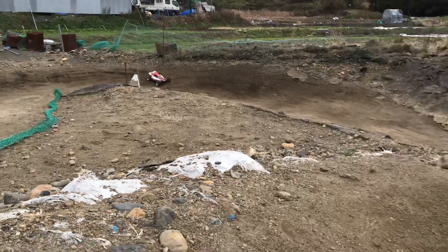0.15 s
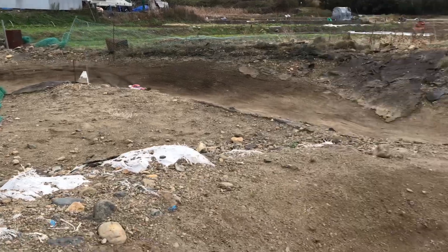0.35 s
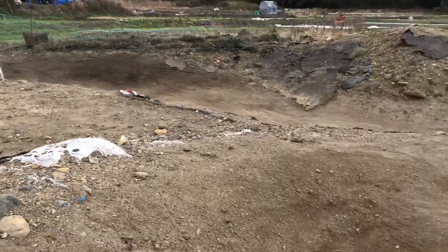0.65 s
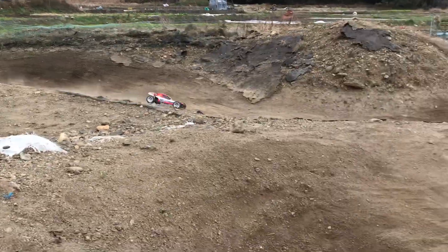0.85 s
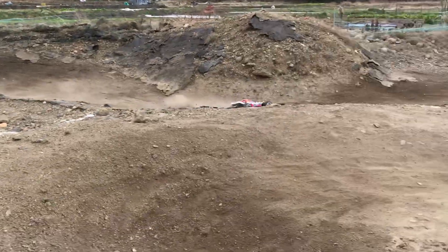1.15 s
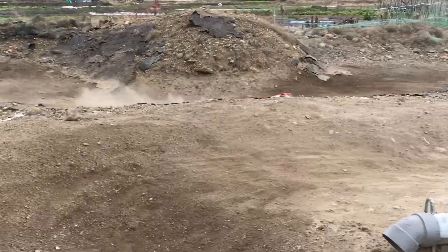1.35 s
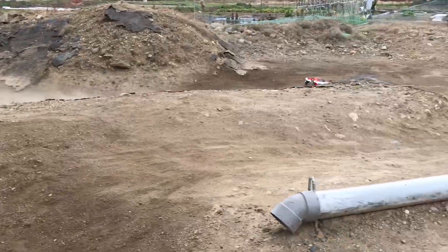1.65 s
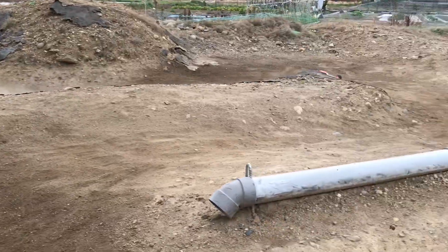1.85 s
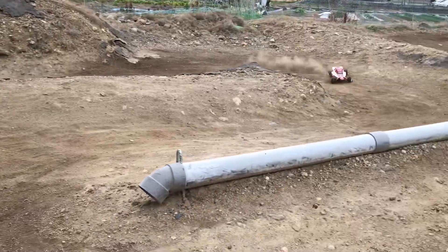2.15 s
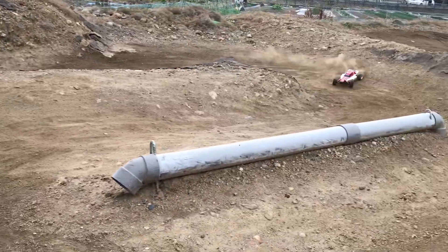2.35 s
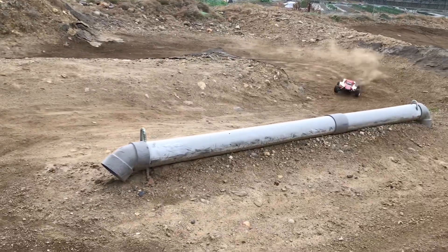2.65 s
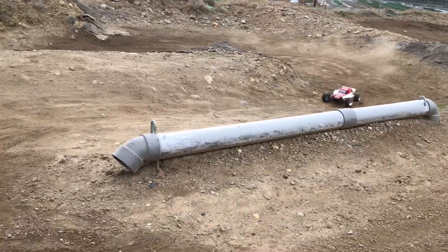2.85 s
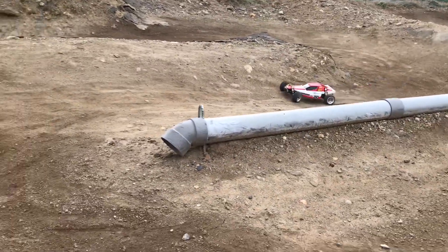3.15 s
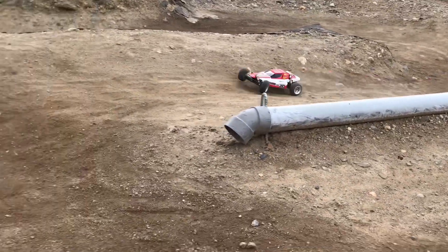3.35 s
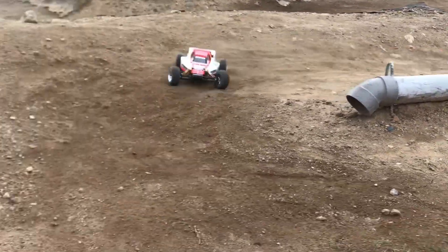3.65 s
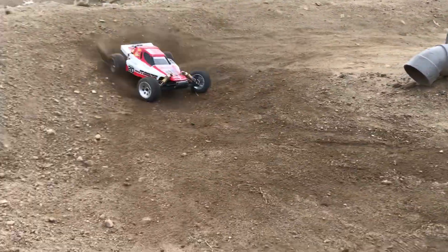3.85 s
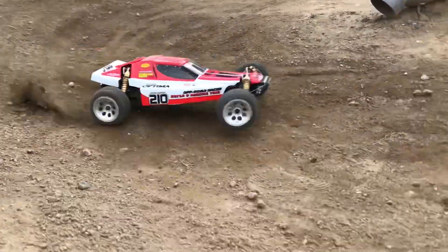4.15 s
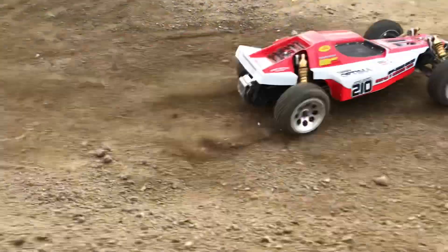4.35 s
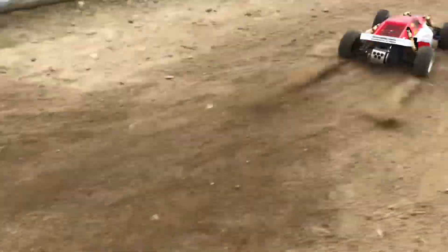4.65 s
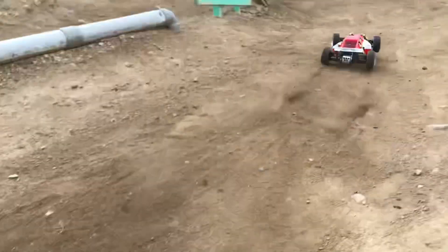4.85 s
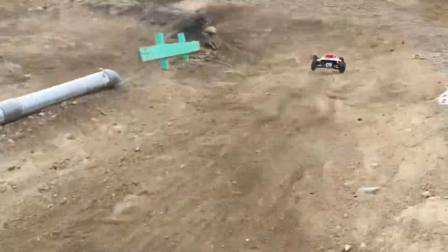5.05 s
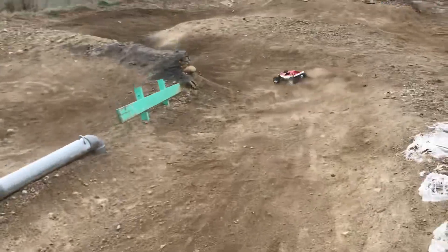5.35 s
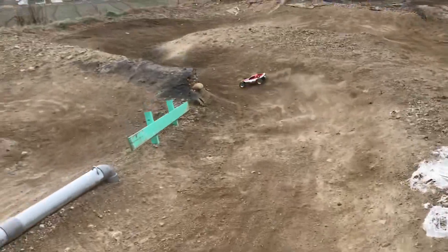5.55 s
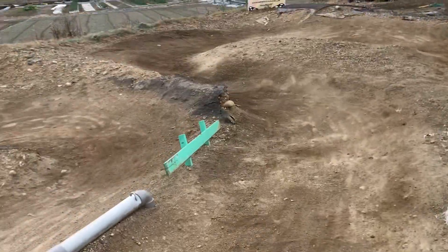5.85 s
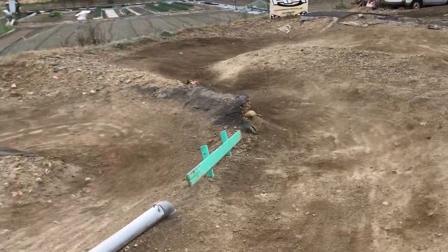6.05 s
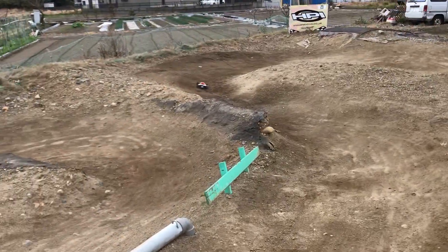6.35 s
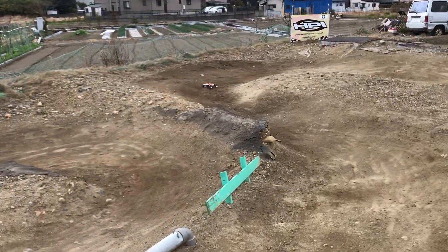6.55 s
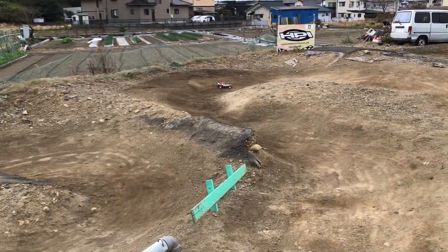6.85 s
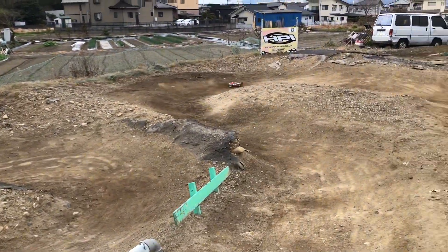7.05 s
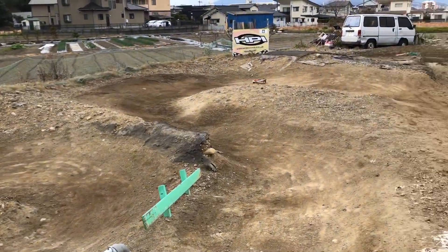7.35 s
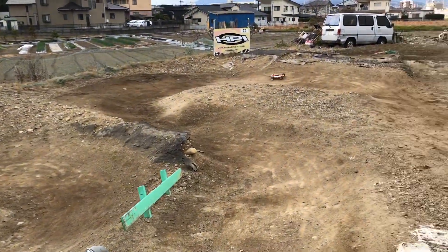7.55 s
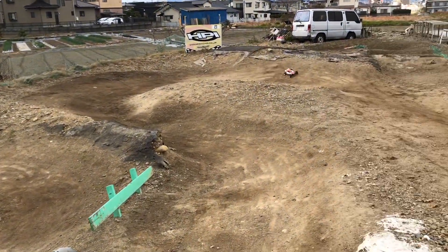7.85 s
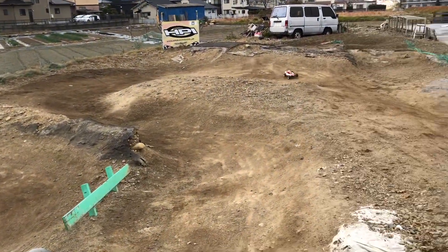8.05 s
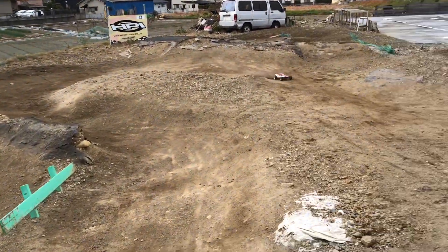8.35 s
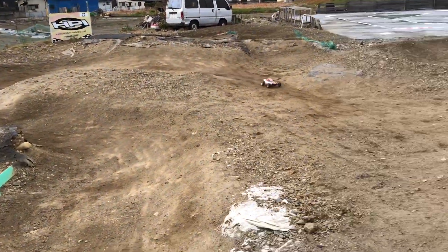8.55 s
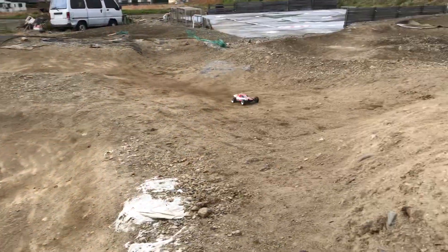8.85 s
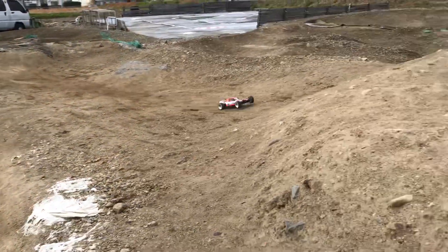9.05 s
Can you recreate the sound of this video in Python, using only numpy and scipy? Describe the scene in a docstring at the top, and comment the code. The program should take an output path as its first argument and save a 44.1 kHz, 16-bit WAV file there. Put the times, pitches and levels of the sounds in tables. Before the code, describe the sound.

A small electric model buggy whines in short bursts across a dirt track, tyres scrabbling loudly as it passes close, then recedes under buffeting wind.

```python
"""On an outdoor dirt track, a small electric model buggy laps and passes close by at about 4.4 s.
Its gears whine at multiples of the motor's tooth rate, louder whenever the motor works hard.
Its tyres scrabble as filtered random clicks and hiss; stones and landings ring the chassis.
Wind buffets, sputters and thumps the microphone as shaped noise and single pressure swings.
A quiet rumble and rustle lie behind it all."""
import sys
import numpy as np
from scipy import signal
from scipy.fft import rfft, irfft, next_fast_len
from scipy.io import wavfile
from scipy.ndimage import uniform_filter1d, minimum_filter1d

SR = 44100
rng = np.random.default_rng(int(sys.argv[2]) if len(sys.argv) > 2 else 0)


def master(y):
    """Save y as 16-bit WAV."""
    cut = np.clip(np.atleast_2d(y).T, -1, 1)
    pcm = np.round(cut * 32767)  # scale
    wavfile.write(sys.argv[1], SR, pcm.astype(np.int16))


N = 406602
TIME = np.arange(N) / SR
STEPS = TIME[::40]  # coarse time grid for slow controls, s
TOP_HZ = 15750  # upper limit of the sound


def undb(db):
    """Turn decibels into gain."""
    return 10 ** (np.asarray(db) / 20)


def unit(x):
    """Scale to an rms (average strength) of 1."""
    return x / np.sqrt(np.mean(x ** 2))


def fine_time(control):
    """Stretch a coarse control to one value per sample."""
    return np.interp(TIME, STEPS, control)


def curves(table):
    """Join each table column by straight lines in time."""
    s, *columns = np.transpose(table)
    return [np.interp(TIME, s, column) for column in columns]


def ramp(start, length):
    """Rise smoothly from 0 to 1 on the coarse time grid."""
    u = np.clip((STEPS - start) / max(length, .002), 0, 1)
    return u * u * (3 - 2 * u)


def held(start, end, attack_s, release_s):
    """Rise around the start, hold, then die away exponentially after the end."""
    return ramp(start - attack_s / 2, attack_s) * np.exp(-np.maximum(STEPS - end, 0) / release_s)


def spans(table, edge_s):
    """Apply the value of each (start, end, value) row while it lasts, with soft edges."""
    total = 0
    for start, end, value in table:
        total = total + value * (ramp(start - edge_s / 2, edge_s) - ramp(end - edge_s / 2, edge_s))
    return fine_time(total)


def response(points, hz):
    """Read the gain of a (f/Hz, level/dB) spectrum at the given frequencies."""
    f, db = np.transpose(points)
    return undb(np.interp(np.log(hz + 1), np.log(f), db))


def colour(x, points):
    """Shape the spectrum of x, falling away beyond both ends; rms 1."""
    hz = np.arange(N // 2 + 1) * SR / N
    low_end = np.minimum(hz / points[0][0], 1) ** 2
    high_end = np.maximum(hz / points[-1][0], 1) ** 3
    return unit(irfft(rfft(x) * response(points, hz) * low_end / high_end, N))


def walk(rate):
    """Wander smoothly at random, with about `rate` new values a second; rms 1."""
    size = next_fast_len(N // 10 + 2)
    hz = np.arange(size // 2 + 1) * SR / 10 / size
    slow = irfft(rfft(rng.standard_normal(size)) * np.exp(-(hz / rate) ** 2 * 2), size)
    return unit(np.interp(np.arange(N) / 10, np.arange(size), slow))


def grains(rate, spread_db):
    """Scatter about `rate` random clicks a second, mostly small and a few large; rms 1."""
    hit = rng.random(N) < rate / SR
    size_db = spread_db * np.minimum(rng.exponential(size=N), 4)
    return unit(hit * rng.standard_normal(N) * undb(size_db))


def ring(x, hz, width):
    """Ring one resonance, with gain 1 at its centre."""
    return signal.lfilter(*signal.iirpeak(min(hz, .45 * SR), hz / width, fs=SR), x)


# The throttle opens and the motor winds up. Mesh rate means gear teeth meeting per second.
# t/s, length/s, first mesh f/Hz, last mesh f/Hz, whine level/dB, upper partials relative level/dB
STABS = [(0.889, 0.076, 1960, 2457, -30, -18), (1.792, 0.065, 1500, 2493, -47, 7),
         (2.136, 0.093, 1203, 2882, -28.5, -3), (2.872, 0.13, 1147, 1998, -36.5, -4),
         (3.261, 0.054, 2437, 2949, -28.5, -13), (3.644, 0.12, 1299, 2716, -18.5, -5.5),
         (4.035, 0.068, 1350, 1970, -15.5, -1), (4.105, 0.04, 1998, 2630, -20, -6),
         (4.284, 0.094, 1950, 2312, -13, -1), (4.572, 0.085, 2226, 2980, -19.5, -6.5),
         (4.76, 0.044, 2425, 2970, -22, -2), (5.987, 0.11, 1616, 2257, -43, -20),
         (7.675, 0.069, 1630, 1888, -44, -5), (7.743, 0.088, 1957, 2955, -40, -4),
         (8.608, 0.078, 3150, 3304, -35.5, -16)]
# Spinning wheels bite, drag the motor down and let it pull back up.
# t/s when slowest, drag/s, pull/s, slowest mesh f/Hz, regained mesh f/Hz, whine level/dB,
# upper partials relative level/dB
BITES = [(0.054, 0.048, 0.042, 1780, 2270, -38, 0), (0.152, 0.021, 0.028, 2072, 2130, -34.5, -6),
         (0.201, 0.038, 0.11, 2000, 3194, -37.5, -4), (0.385, 0.021, 0.054, 2120, 3110, -38, -6),
         (0.469, 0.032, 0.061, 2720, 3310, -36, -12), (0.646, 0.0073, 0.07, 2280, 2920, -32.5, -9),
         (1.001, 0.04, 0.09, 1930, 3256, -30.5, -15), (1.196, 0.023, 0.04, 1880, 2020, -35.5, -26),
         (1.305, 0.015, 0.064, 2030, 2485, -32, -21), (1.509, 0.067, 0.062, 2884, 3075, -43, -23),
         (1.886, 0.025, 0.056, 2330, 2854, -31.5, -10), (2.066, 0.042, 0.0077, 1980, 1966, -30, -10),
         (2.35, 0.061, 0.02, 2200, 2180, -53, -10), (2.409, 0.03, 0.053, 1850, 2400, -37, 5.5),
         (2.52, 0.03, 0.068, 2000, 2830, -34.5, 3), (3.06, 0.038, 0.016, 1750, 2163, -31.5, -1),
         (3.09, 0.022, 0.06, 2160, 2323, -28, -22), (3.452, 0.044, 0.015, 1650, 1590, -38.5, -23),
         (3.805, 0.034, 0.055, 2460, 2796, -19.5, -10), (4.189, 0.051, 0.017, 2350, 2292, -17.5, -4.5),
         (4.428, 0.029, 0.06, 1980, 2508, -13.5, 2.5), (4.545, 0.025, 0.042, 2170, 2270, -24.5, 7.5),
         (4.733, 0.015, 0.031, 2470, 2498, -17.5, -4), (4.927, 0.049, 0.032, 2580, 2744, -19.5, -7),
         (5.4, 0.05, 0.02, 1920, 1900, -47, -15), (5.452, 0.03, 0.082, 1700, 2890, -37.5, 1),
         (5.645, 0.042, 0.078, 1850, 2237, -37, 1.5), (6.16, 0.033, 0.06, 1900, 2985, -32, -7),
         (6.35, 0.04, 0.026, 2150, 2500, -34, -9), (6.675, 0.02, 0.08, 1997, 2950, -34, -7),
         (6.801, 0.031, 0.056, 2403, 3096, -34, -8), (6.894, 0.032, 0.017, 2380, 2564, -38, -18),
         (6.945, 0.018, 0.042, 2290, 2626, -40, -19), (7.034, 0.06, 0.068, 2134, 3236, -42, -10.5),
         (7.19, 0.041, 0.041, 2040, 1910, -45, -5.5), (7.858, 0.042, 0.016, 1950, 1844, -36.5, -8),
         (7.904, 0.014, 0.061, 3050, 3055, -38.5, -8), (8.012, 0.036, 0.045, 2930, 3270, -37.5, -13),
         (8.114, 0.044, 0.14, 2330, 3365, -38.5, -20), (8.31, 0.018, 0.092, 2720, 3466, -43, -11),
         (8.449, 0.038, 0.1, 2790, 3580, -33, -9), (8.59, 0.035, 0.03, 2960, 3166, -31, -10),
         (9.18, 0.03, 0.04, 3290, 3420, -46, -14)]
SWELL_SHARE, RELEASE_S = 0.27, 0.028  # part of a stab spent swelling; time the whine takes to die away
UNLOAD_DB = -6  # the whine eases as the motor regains speed
FREE_RISE_HZ, FREE_RISE_S = 244.3, .07  # unloaded, the motor spins up a little further
GRIP_S = .016  # time for the wheels to load the motor in a bite
COAST_DB = -20.5  # gears left running between stabs, relative to the tyre level table


def motor(wind_up=1.5, grip_share=0.93):
    """Stabs and bites steer the motor speed; the gears sing out under load and faintly in between."""
    mesh_hz, load, upper = np.full(len(STEPS), 2900.), 0 * STEPS, 0 * STEPS
    for row in sorted(STABS + BITES):
        if row in STABS:
            s, length, first_hz, last_hz, db, upper_db = row
            to_go = (1 - np.clip((STEPS - s) / length, 0, 1)) ** wind_up
            stab_hz = last_hz + (first_hz - last_hz) * to_go
            mesh_hz = mesh_hz + (stab_hz - mesh_hz) * (STEPS >= s)
            dying = np.exp(-np.maximum(STEPS - s - length, 0) / RELEASE_S)
            effort = ramp(s, SWELL_SHARE * length) * dying
        else:
            s, drag, pull, slow_hz, regained_hz, db, upper_db = row
            slowing_hz = (slow_hz - mesh_hz) * ramp(s - drag, drag)
            mesh_hz = mesh_hz + slowing_hz + (regained_hz - slow_hz) * ramp(s, pull)
            mesh_hz = mesh_hz + FREE_RISE_HZ * ramp(s + pull, FREE_RISE_S) * (regained_hz > slow_hz)
            grip = held(s - grip_share * drag, s + pull, GRIP_S, RELEASE_S)
            effort = grip * undb(UNLOAD_DB * ramp(s, pull) ** 2)
        load = np.maximum(load, undb(db) * effort)
        upper = np.maximum(upper, undb(db + upper_db) * effort)
    mesh_hz, load, upper = (fine_time(control) for control in hops(mesh_hz, load, upper))
    coasting = undb(curves(PASS)[0] + lifts() + COAST_DB)
    return mesh_hz, np.maximum(load, coasting), upper


# Hopping wheels touch down and snatch at the motor in a short yelp.
# t/s, length/s, first mesh f/Hz, last mesh f/Hz, whine level/dB, upper partials relative level/dB
HOPS = [(0.356, 0.016, 3380, 2296, -37, -17), (0.62, 0.0085, 3115, 2200, -35, -12),
        (0.754, 0.0066, 2800, 2450, -35.5, -12), (0.964, 0.02, 2970, 2037, -32.5, -16),
        (1.154, 0.016, 2840, 2130, -35.5, -18), (2.005, 0.0089, 3013, 2200, -28, -4),
        (3.163, 0.015, 2027, 1572, -30, 4), (3.18, 0.011, 1593, 1556, -27, 0),
        (3.195, 0.0041, 1920, 1717, -26.5, 6.5), (3.214, 0.005, 2234, 2052, -29.5, -6),
        (3.232, 0.0079, 2160, 1940, -30, -2), (3.242, 0.0089, 2477, 1952, -28, -12),
        (3.264, 0.006, 2892, 2438, -25, -6), (3.323, 0.0165, 2550, 2183, -21, -13),
        (3.348, 0.00505, 2417, 1963, -21, -8), (3.367, 0.00603, 2291, 2215, -30, -18),
        (4.21, 0.024, 2318, 1772, -15, -1.5), (4.723, 0.0077, 3010, 2485, -21, -7),
        (4.959, 0.0073, 2944, 2715, -21, -5), (5.59, 0.0095, 3050, 2510, -32.5, -3),
        (6.131, 0.008, 2700, 2050, -35, -3), (6.317, 0.00657, 2990, 2300, -27, -17),
        (6.34, 0.0078, 2900, 2110, -27, -12), (8.3, 0.012, 3345, 2705, -36, -16),
        (8.426, 0.016, 3330, 2820, -33.5, -13), (8.572, 0.016, 2860, 2650, -25.5, -11),
        (8.596, 0.012, 3064, 2850, -27, -17), (8.647, 0.01, 3220, 3100, -30, -12),
        (8.68, 0.009, 3230, 2934, -26.5, -12), (8.725, 0.0086, 1795, 1726, -36, -11),
        (8.795, 0.0067, 1706, 1690, -38, 0), (8.826, 0.0084, 1684, 1630, -37, -12)]
HOP_ATTACK_S, HOP_RELEASE_S, HOP_RECOVER_S = 0.00298, .003, .008


def hops(mesh_hz, load, upper):
    """Each touchdown drags the motor down for a moment, under a sudden load."""
    for s, length, first_hz, last_hz, db, upper_db in HOPS:
        snatched_hz = np.interp(STEPS, [s, s + length], [first_hz, last_hz])
        snatch = held(s - HOP_ATTACK_S, s + length + HOP_RELEASE_S, HOP_ATTACK_S, HOP_RECOVER_S)
        mesh_hz = mesh_hz + (snatched_hz - mesh_hz) * snatch
        effort = held(s, s + length, HOP_ATTACK_S, HOP_RELEASE_S)
        load = np.maximum(load, undb(db) * effort)
        upper = np.maximum(upper, undb(db + upper_db) * effort)
    return mesh_hz, load, upper


# Main tones of the gearbox: multiple of the mesh rate, level/dB, roughness 0-1
GEARS = [(2 / 3, -9.5, 0.54), (3 / 3, 0, 0.46), (4 / 3, -12, 1)]
# Upper tones, strongest under load: multiple of the mesh rate, level/dB, roughness 0-1
OVERTONES = [(5 / 3, -12, 0.59), (6 / 3, 0, 0.77), (7 / 3, -7.5, 0.75), (8 / 3, -8, 0.64),
             (26 / 9, -1.4, 0.7), (9 / 3, -1.5, 0.7), (35 / 9, -5, 0.65)]
# Side tones that crowd in as the gears rattle: multiple of the mesh rate, level/dB, roughness 0-1
SIDE_GEARS = [(2 / 3, 0, 0.83), (17 / 18, -3.2, 1), (19 / 18, -1.5, 1), (4 / 3, 0, 0.61)]
# Rough ground shakes the loosely fitting teeth: start t/s, end t/s, looseness 0-1
RATTLES = [(0.0, 0.14, 1), (0.34, 0.76, 0), (0.89, 1.09, 0.71), (1.16, 1.6, 0.49), (1.79, 2.29, 0.44),
           (2.33, 2.62, 0.78), (3.02, 3.22, 0.6), (3.64, 3.9, 0.3), (4.02, 4.13, 0.72), (4.21, 4.58, 0.98),
           (4.61, 5.02, 0.83), (5.4, 6.4, 0.76), (6.66, 6.92, 0.58), (7.72, 8.4, 0.25), (8.42, 8.72, 0.75)]
WOBBLE, CHATTER = .007, .011  # slow and fast speed shake, as shares of the speed (looseness adds wobble)


def gearbox(mesh_hz, load, upper, throb_db=2.0, whine_db=1, upper_db=-0.5, side_share=0.04,
            side_gain=0.8, runout=0.043, stutter_db=3):
    """Meshing teeth sing, an off-centre gear snarls, and rough ground shakes and stutters the whine."""
    loose = np.clip(spans(RATTLES, 0.011), 0, 1)
    shake = WOBBLE * (1 + loose) * walk(108.1) + CHATTER * walk(604)
    mesh_hz = uniform_filter1d(mesh_hz, size=130) * (1 + shake)
    side = side_share + side_gain * loose
    teeth = (partials(GEARS, mesh_hz) + side * partials(SIDE_GEARS, mesh_hz)) / np.hypot(1, side)
    whine = load * teeth + upper * undb(upper_db) * partials(OVERTONES, mesh_hz)
    turn = 2 * np.pi * np.cumsum(mesh_hz) / SR / 6  # one gear turn per six mesh cycles
    snarl = 1 + runout * walk(35) * np.sin(turn)
    # the -3 makes loose gears quieter on average as well as unsteady
    surge_db = whine_db + throb_db * walk(113) + stutter_db * loose * (walk(116) - 3.0)
    return whine * snarl * undb(surge_db)


# How the plastic shell sends out the gear tones: f/Hz, level/dB
SHELL = [(500, 9), (1000, 9.5), (1320, 12.5), (1750, 12), (1950, 13), (2250, 20.5), (2600, 14.5),
         (3050, 14.5), (3500, 8.5), (3950, 11.5), (4550, 17), (5200, 11), (5700, 13.5), (6400, 13.5),
         (7150, 6), (8500, 1), (15000, 9)]
FADE_RATE = 24  # new fade values per second


def partials(table, mesh_hz, fade_db=4.5, rattle_rate=200):
    """Tones follow the motor; loose teeth roughen each, and each fades alone as the buggy turns."""
    phase = 2 * np.pi * np.cumsum(mesh_hz) / SR
    out, power = 0, 0
    for multiple, db, rough in table:
        rough = np.clip(rough, 0, .75)  # rougher entries are held at this limit
        size = undb(db + fade_db * walk(FADE_RATE)) * response(SHELL, multiple * mesh_hz)
        steady = np.sqrt(2 * (1 - rough ** 2))
        in_step = (steady + rough * walk(rattle_rate)) * np.sin(multiple * phase)
        out_of_step = rough * walk(rattle_rate) * np.cos(multiple * phase)
        out = out + size * (in_step + out_of_step)
        power = power + size ** 2
    return out / np.sqrt(power)  # rms near 1


# Shrieks of the pinion, the small driving gear: start t/s, end t/s, level/dB
SQUEALS = [(0.037, 0.051, -40), (3.039, 3.065, -38), (3.793, 3.827, -22), (4.144, 4.207, -20.5),
           (4.415, 4.434, -19.5), (4.73, 4.764, -30), (5.437, 5.466, -35), (5.632, 5.677, -39),
           (6.135, 6.178, -42), (7.831, 7.884, -41)]
# Its tone: multiple of the mesh rate, level/dB, roughness 0-1
PINION = [(26 / 9, 0, 0.83)]


def squeals(mesh_hz, squeal_db=0, waver=0.014, rise_s=0.006, fall_s=0.0049):
    """A shock load makes the pinion shriek high above the whine, following the motor's pitch."""
    efforts = [undb(db + squeal_db) * held(start, end, rise_s, fall_s) for start, end, db in SQUEALS]
    shriek = unit(partials(PINION, mesh_hz * (1 + waver * walk(316))))
    return shriek * fine_time(np.max(efforts, axis=0))


# Tyre noise as the buggy nears, passes and circles away, before small level trims.
# t/s, scrabble level/dB, fine spray relative level/dB, low crunch relative level/dB
PASS = [(0.0, -42.5, -12, -10), (1.0, -47, -8, 3), (1.8, -42, -2, -0.5), (2.5, -35.5, -14, -8),
        (2.9, -39.5, -8, -4), (3.4, -37.5, -6, 0), (3.75, -28, -2.5, -6), (4.4, -24, 0, -1.5),
        (4.7, -27, 2.5, -6), (5.15, -40, -3.5, -3), (5.65, -43, -1, -4.5), (6.2, -51, 2, 6.5),
        (7.1, -49.5, -4, -17), (8.1, -48, -5, -7), (8.7, -46, 2.5, 4.5), (9.22, -44, -9, 3)]
# Wheels spin and judder on loose stones: start t/s, end t/s, scrabble change level/dB
SKIDS = [(0.904, 1.081, 5), (2.326, 2.663, -3), (3.236, 3.362, 6), (4.304, 4.51, -2), (5.429, 5.72, 3.5),
         (6.271, 6.369, 8), (8.541, 8.722, 4.5)]
# Spectrum of flying grit: f/Hz, level/dB per Hz
GRAVEL = [(710, 6), (1200, 6.5), (1520, 8.5), (1820, 9.5), (2240, 8.5), (3120, 9.5), (4170, 7.5),
          (4550, 7.5), (4910, 6), (5830, 2.5), (10500, -4), (13000, -1), (15700, -7)]
# Spectrum of the ground crunching below: f/Hz, level/dB per Hz
CRUNCH = [(120, -25), (300, 9), (600, 6), (1000, 6.5), (1500, 2), (2200, 5), (4000, -1.5)]


def tyres(load, scrabble_db=1, spray_db=0, patchy_db=1.0, ruts_db=1.0, judder_db=2, dust=1.45,
          split_hz=8000, fling_db=-12, crunch_lift=0.32):
    """Tread bites unevenly: grit scrabbles, sand sprays more under load, and the ground crunches."""
    level_db, fine_db, crunch_db = curves(PASS)
    lift_db = lifts()
    judder = spans([(start, end, judder_db) for start, end, _ in SKIDS], 0.031) * walk(100)
    skid_db = spans(SKIDS, .02) + judder
    bite = undb(patchy_db * walk(170) + ruts_db * walk(7.7))
    grit = clumps(colour(grains(4500, 0.7) + dust * rng.standard_normal(N), GRAVEL))
    coarse = unit(signal.sosfilt(signal.butter(4, split_hz, "low", fs=SR, output="sos"), grit))
    fine = unit(signal.sosfilt(signal.butter(4, split_hz, "high", fs=SR, output="sos"), grit))
    scrabble = coarse * undb(level_db + lift_db + skid_db + scrabble_db)
    rolling_spray = undb(level_db + 2.1 * lift_db + fine_db + spray_db)
    spray = fine * np.hypot(rolling_spray, load * undb(fling_db))
    crunch = colour(grains(1500, 2.8), CRUNCH) * undb(level_db + crunch_lift * lift_db + crunch_db)
    return bite * (scrabble + spray + crunch)


# The throttle is lifted or the wheels leave the ground: start t/s, end t/s, scrabble change level/dB
LIFTS = [(0.741, 0.894, 3), (1.369, 1.775, -9.5), (2.075, 2.122, -9), (2.642, 2.812, -9),
         (3.447, 3.622, -10), (3.884, 4.0, -11), (4.49, 4.683, -3.5), (4.224, 4.305, -3),
         (5.73, 5.956, -7.5), (6.367, 6.623, -1), (7.176, 7.647, -5.5), (8.722, 8.917, -3)]
LIFT_FADE_S, LIFT_BACK_S = 0.053, 0.067  # easing into the change; smooth return around its end


def lifts():
    """The scrabble eases towards a new level, usually a drop, then returns; the result is in dB."""
    change_db = 0
    for start, end, db in LIFTS:
        fade = 1 - np.exp(-np.maximum(STEPS - start, 0) / LIFT_FADE_S)
        change_db = change_db + db * fade * (1 - ramp(end - LIFT_BACK_S / 2, LIFT_BACK_S))
    return fine_time(change_db)


CLUMP_DB, CLUMP_RATE = 2.6, 110  # surge size; new values per second


def clumps(x, count=10):
    """Grit flies in clumps of like-sized grains, so each band of the treble surges on its own."""
    hz = np.arange(N // 2 + 1) * SR / N
    place = np.interp(hz, [2000, TOP_HZ], [0, count - 1])
    spectrum, out = rfft(x), 0
    for k in range(count):
        band = irfft(spectrum * np.maximum(1 - np.abs(place - k), 0), N)
        out = out + band * undb(CLUMP_DB * walk(CLUMP_RATE))
    return unit(out)


# Stones and landings knock the buggy; the shared trims in knocks() are added to both levels.
# t/s, peak level/dB, low knock relative level/dB
KNOCKS = [(0.2523, -33, -15), (0.644, -39, -17), (0.8977, -24, -8), (1.781, -14.5, 21), (1.946, -18.5, -3),
          (2.1365, -15, -16), (2.3413, -19, -11), (2.362, -19, -13), (2.399, -18, -7), (2.616, -39, -11),
          (2.6414, -20, -31), (3.1573, -12.5, -14), (3.2191, -17, -17), (3.474, -15, 10), (3.619, -16, -26),
          (3.895, -8, -5), (3.928, -15, -6), (4.003, -10, -14), (4.27, -5, -11), (4.2885, -1.5, -16),
          (4.503, -9, -17), (4.53, -26, -23), (5.1618, -13, -17), (5.1835, -16.5, -8), (5.251, -19, 5),
          (6.128, -26, -14), (6.643, -27, -9), (8.952, -33, -8), (8.993, -37, -4)]
# The shell and chassis ring: f/Hz, width f/Hz, level/dB
CHASSIS = [(1130, 780, 12), (1690, 85, 16.5), (2280, 260, 21.5), (3180, 140, 17.5), (4570, 500, 5),
           (5150, 690, 17), (7100, 900, -38.5), (11300, 7600, -4)]


def knocks(knock_db=-2, rattle_s=0.003, low_db=18, size=3000):
    """Each blow is a short rattle of contacts that rings the chassis; heavy ones ring lower."""
    out, age = np.zeros(N + size), np.arange(size) / SR
    for s, peak_db, heavy_db in KNOCKS:
        contacts = rng.standard_normal(size) * np.exp(-age / rattle_s)
        blow = 0
        for hz, width, db in CHASSIS:
            mode_db = db + (heavy_db + low_db) * (hz < 2000)
            blow = blow + undb(mode_db) * ring(contacts, hz, width)
        start = int(s * SR)
        out[start:start + size] += blow / np.abs(blow).max() * undb(peak_db + knock_db)
    return out[:N]


def banks(x, echo_db=-15, decay_s=0.024, size=8000):
    """Earth banks round the track scatter a brief, dull echo."""
    age = np.arange(size) / SR
    dull = signal.lfilter(*signal.butter(1, 5000, fs=SR), rng.standard_normal(size))
    scatter = dull * np.exp(-age / decay_s) * (age > .004)
    echo = signal.fftconvolve(x, scatter / np.linalg.norm(scatter))[:N]
    return x + undb(echo_db) * echo


# Gusts rock the microphone and tear into small eddies (swirls of air), before level trims.
# start t/s, end t/s, buffet level/dB, eddy level/dB
GUSTS = [(0.095, 0.226, -26, -27), (0.288, 0.295, -11, -19), (0.347, 0.407, -26.5, -32),
         (0.568, 0.598, -50, -29), (0.675, 0.707, -15.5, -28.5), (0.747, 0.753, -23.5, -27.5),
         (0.922, 1.004, -17.5, -44), (1.307, 1.373, -28.5, -46.5), (1.5, 1.541, -31.5, -44),
         (2.453, 2.48, -27, -61), (2.541, 2.572, -27.5, -61), (3.515, 3.606, -13, -44),
         (3.674, 3.951, -15.5, -28.5), (3.97, 4.028, -8, -23), (4.042, 4.194, -21, -29.5),
         (4.243, 4.275, -23, -21.5), (4.821, 4.878, -15, -38), (4.893, 4.969, -19.5, -38),
         (4.99, 5.025, -12, -37), (5.051, 5.13, -18.5, -28.5), (5.169, 5.295, -10.5, -29),
         (5.342, 5.459, -15, -22.5), (5.478, 5.696, -18, -28.5), (5.73, 5.839, -14.5, -38),
         (6.002, 6.036, -16.5, -14.5), (6.268, 6.326, -35, -16), (6.347, 6.414, -22.5, -21),
         (6.419, 6.474, -34, -33.5), (6.477, 6.547, -29, -14.5), (6.544, 6.593, -7, -13),
         (6.586, 6.676, -20, -21), (6.77, 6.86, -9, -13), (6.872, 6.952, -31, -22.5),
         (6.955, 7.148, -19, -16.5), (7.183, 7.227, -25, -16.5), (7.249, 7.393, -23, -16),
         (7.393, 7.504, -16, -22), (7.637, 7.729, -19, -22), (7.746, 7.829, -16, -15),
         (7.834, 7.928, -20, -24), (8.02, 8.044, -13, -33.5), (8.067, 8.111, -12, -23),
         (8.121, 8.188, -17.5, -17), (8.187, 8.218, -11, -39), (8.229, 8.324, -35, -26.5),
         (8.958, 8.968, -20, -46)]
# Spectrum of the small eddies: f/Hz, level/dB per Hz
EDDIES = [(110, -6.5), (200, 2), (320, -1), (500, -6.5), (800, -15.5), (1200, -32), (1800, -38),
          (3000, -49.5)]
# Spectrum of the steep pressure fronts inside a gust: f/Hz, level/dB per Hz
FRONTS = [(200, 11.5), (450, -4.5), (900, 0.5), (1400, -14.5), (2000, -39), (3200, -52)]
GUST_EDGE_S = .005
GUST_ARCH_DB = 3  # a gust sputters hardest in its middle


def gusts(gust_db=1, flutter_db=3.5, front_db=-8, front_rate=130):
    """Wind breaks away abruptly into a swelling, easing sputter of eddies, with fronts that pop."""
    strength = np.zeros(len(STEPS))
    for start, end, _, db in GUSTS:
        arch = np.sin(np.pi * np.clip((STEPS - start) / (end - start), 0, 1)) - 2 / np.pi
        inside = np.minimum(STEPS - start, end - STEPS)
        strength += undb(db + GUST_ARCH_DB * arch) * np.clip(inside / GUST_EDGE_S + .5, 0, 1)
    sputter = colour(rng.standard_normal(N) * undb(flutter_db * walk(157)), EDDIES)
    fronts = colour(grains(front_rate, 0.14), FRONTS)
    return fine_time(strength) * (undb(gust_db) * sputter + undb(front_db) * fronts)


# Spectrum of the wind rocking the microphone: f/Hz, level/dB per Hz
BUFFET = [(25, -38), (45, 3), (70, 6), (140, -1), (220, -6), (330, -12), (500, -38.5), (900, -86)]
# The breeze between gusts: t/s, buffet level/dB
BREEZE = [(0.0, -20.5), (0.64, -38), (0.92, -33.5), (1.1, -44), (3.54, -38), (3.67, -19), (3.85, -25),
          (4.65, -35), (5.19, -28.5), (5.85, -23.5), (6.1, -27), (7.55, -25), (7.96, -36), (8.45, -34),
          (9.22, -38)]


def buffet(buffet_db=-2, breeze_db=0, breeze_hz=200, gusty_db=5.0, puffs_db=2.0, rise_s=0.022, fall_s=0.024):
    """Large eddies rock the microphone: slowly in the breeze, harder and faster in each gust."""
    low_pass = signal.butter(2, breeze_hz, fs=SR, output="sos")
    breeze = unit(signal.sosfilt(low_pass, colour(rng.standard_normal(N), BUFFET)))
    breeze_level_db = curves(BREEZE)[0] + breeze_db + puffs_db * walk(29.5)
    gust = unit(colour(rng.standard_normal(N), BUFFET) * undb(gusty_db * walk(45)))
    strengths = [undb(db + buffet_db) * held(start, end, rise_s, fall_s) for start, end, db, _ in GUSTS]
    return breeze * undb(breeze_level_db) + gust * fine_time(np.max(strengths, axis=0))


# Single eddies thump the microphone, before a shared level trim: t/s, peak level/dB, pitch f/Hz
THUMPS = [(0.206, -10.5, 264), (0.293, -3, 390), (0.36, -17, 260), (0.693, -3.5, 156), (2.463, -10.5, 45),
          (3.519, -26, 256.4), (4.257, -3.5, 224.6), (4.863, -4.5, 55), (5.05, -6.5, 253.5),
          (5.125, -12, 300), (5.174, -4.5, 220), (5.288, -6.5, 269), (5.382, -19, 223.7),
          (5.583, -5.5, 223), (6.013, -1.5, 214.4), (6.027, -18, 352), (6.294, -9, 529), (6.362, 5, 234),
          (6.386, -27, 540), (6.48, -3, 235), (6.56, 10, 215.5), (6.572, -1, 321.5), (6.755, -4.5, 256),
          (6.774, -19, 245), (6.82, -11, 251.3), (6.835, -9, 246), (6.87, -4.5, 446), (6.92, -6, 450),
          (6.967, -2.5, 426), (7.098, 0, 467), (7.185, 1, 264), (7.211, -8, 225), (7.295, -10, 362),
          (7.381, 0.5, 402), (7.417, -8, 417), (7.64, -15, 300), (7.695, -4.5, 220), (7.782, 3, 223),
          (7.81, -10, 309), (7.863, 0, 254.7), (8.131, -1, 223), (8.243, -9, 400), (8.304, -2, 303)]


def thumps(thump_db=-4):
    """A passing eddy is one swing of pressure: suck, then push."""
    out = np.zeros(N)
    for s, peak_db, hz in THUMPS:
        swing = 2 * np.pi * hz * (TIME - s - .002)  # the swing crosses zero 2 ms after its listed time
        near = np.abs(swing) < 20
        out[near] += undb(peak_db + thump_db) * 2 * swing[near] / (1 + swing[near] ** 2 / 2) ** 2
    return out


# Spectrum of the quiet background: f/Hz, level/dB per Hz
OUTDOORS = [(18, -45), (30, -1.5), (75, -4.5), (250, -22), (578, -25.5), (834, -24.5), (3250, -38.5),
            (10300, -123), (12700, -45), (15700, -62)]
OUTDOORS_DB = -40


def outdoors():
    """Far-off rumble and rustle, made of shaped noise, swell a little."""
    return colour(rng.standard_normal(N), OUTDOORS) * undb(OUTDOORS_DB + 0.26 * walk(3.5))


def scene():
    """Mix the buggy and its echo with the wind and background at one microphone."""
    mesh_hz, load, upper = motor()
    buggy = gearbox(mesh_hz, load, upper) + tyres(load) + knocks() + squeals(mesh_hz)
    wind = buffet() + gusts() + thumps()
    mono = banks(buggy) + wind + outdoors()
    return np.array([mono, mono])


def record(dry):
    """The phone drops the deepest rumble, turns down peaks above full scale and cuts the top."""
    dry = signal.sosfilt(signal.butter(3, 36, "high", fs=SR, output="sos"), dry)
    headroom = 1 / np.maximum(np.abs(dry).max(axis=0), 1)
    gain = uniform_filter1d(minimum_filter1d(headroom, size=300), size=300)
    return signal.sosfilt(signal.ellip(12, .1, 80, TOP_HZ, fs=SR, output="sos"), dry * gain)


dry = scene()
out = record(dry)
master(out)
```